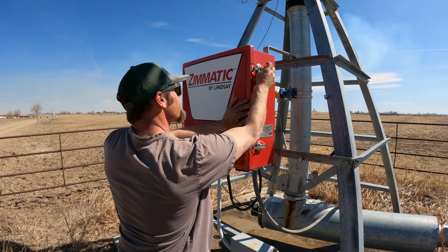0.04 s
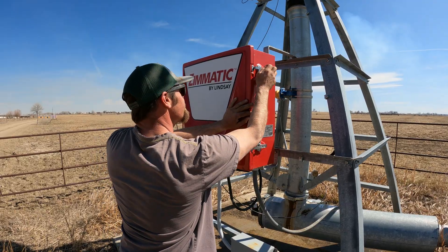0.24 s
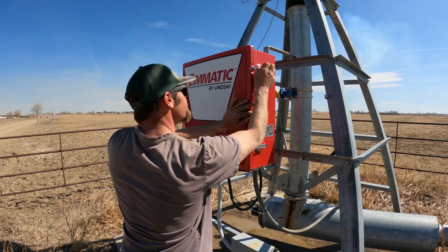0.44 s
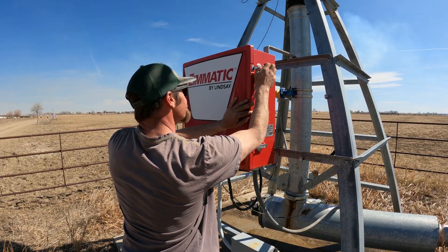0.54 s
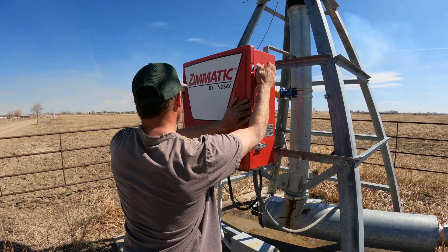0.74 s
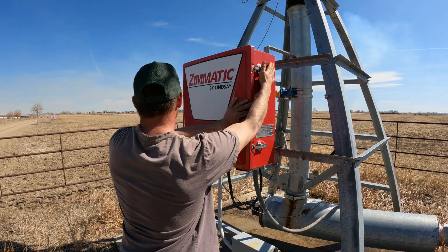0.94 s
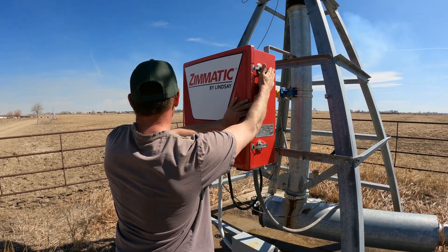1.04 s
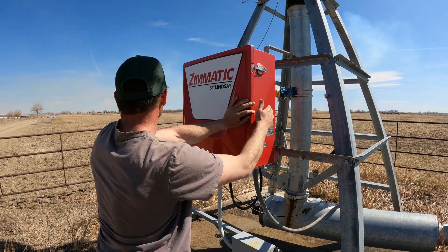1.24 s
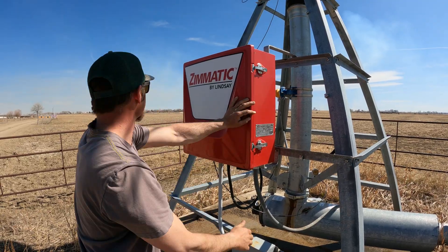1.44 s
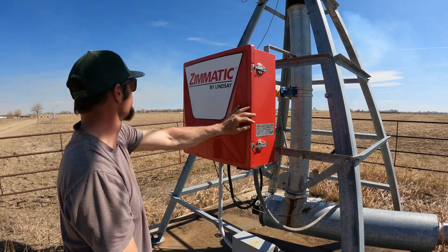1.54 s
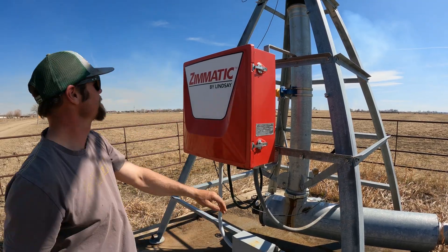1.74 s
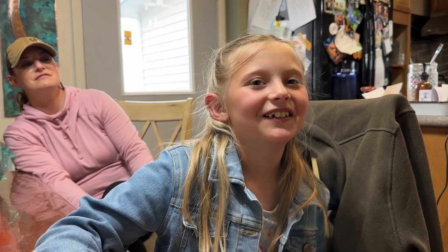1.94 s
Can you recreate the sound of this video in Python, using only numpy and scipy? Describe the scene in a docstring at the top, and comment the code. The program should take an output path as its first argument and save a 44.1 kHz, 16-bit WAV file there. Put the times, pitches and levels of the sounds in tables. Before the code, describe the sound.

Metal latches on a steel control box clatter quickly, snap once, then bang hard twice with a brief hollow ring; small ticks and dry rustle follow in an open field, close camera microphone buffeted by wind.

```python
"""A latch scrapes and snaps, then a sheet-steel control box bangs and rings briefly, a few metres off in an
open field. Small ticks and dry rustle fill the gaps; wind rumbles and puffs on a small camera's two ports.
Blows and gritty scrapes excite decaying modes and banded noise; ticks are short noisy rings; rustle, murmur
and wind are coloured noise. The level of rumble and flutter dips sharply and briefly just before the end."""
import sys
import numpy as np
from scipy import signal
from scipy.fft import rfft, irfft
from scipy.io import wavfile
from scipy.ndimage import uniform_filter1d

SR = 44100
rng = np.random.default_rng(int(sys.argv[2]) if len(sys.argv) > 2 else 0)


def wrap_up_sound(samples):
    """Save the sound to the file named by the first command line argument, as 16-bit audio."""
    columns = np.atleast_2d(samples).T
    # keep every value between -1 and 1, then stretch to whole-number steps
    tamed = np.clip(columns, -1, 1)
    steps = np.round(tamed * 32767).astype(np.int16)
    wavfile.write(sys.argv[1], SR, steps)


N = 88200  # samples: two seconds

# Latch and door blows: (time [s], crack peak [dB], boom [dB], clank [dB], ring [dB], snap [dB], base decay t60 [s],
# crack centre [Hz], crack width [share], crack t60 [s], thud of the lowest modes [dB])
BLOWS = [(0.0534, -34.5, -33, -33, -43, -47, 0.37, 2500, 0.18, 0.13, -31.5),
         (0.096, -35, -71, -41, -52, -47.5, 0.13, 1910, 0.081, 0.16, -68),
         (0.134, -29.5, -41.5, -33.5, -41.5, -68, 0.33, 1816, 0.064, 0.39, -59),
         (0.1632, -23, -63, -51, -40.5, -28.5, 0.17, 6200, 0.52, 0.042, -61),
         (0.1653, -19, -36, -22.5, -53, -34, 0.052, 1910, 0.25, 0.043, -48),
         (0.1883, -33, -70, -49.5, -69, -57, 0.027, 5440, 0.24, 0.046, -63),
         (0.497, -58, -68, -44.5, -57, -64, 0.075, 5500, 0.69, .02, -54),
         (0.5038, -42.5, -62, -35, -60, -75, 0.12, 934, 0.098, 0.23, -54),
         (0.5191, -20.5, -49, -29.5, -40.5, -34, 0.21, 2125, 0.22, 0.2, -52),
         (0.5264, -13.5, -32, -21, -31.5, -22.5, 0.16, 1953, 0.19, 0.059, -38),
         (0.661, -36, -66, -51, -49, -66, 0.19, 1157, 0.095, 0.23, -51),
         (0.681, -24.5, -43.5, -31.5, -47, -51, 0.15, 2247, 0.12, 0.048, -42.5),
         (0.9615, -8.5, -33, -17.5, -24.5, -20.5, 0.13, 2570, 0.33, 0.019, -23),
         (1.0063, -11, -28, -18.5, -24.5, -32, 0.16, 2070, 0.96, 0.037, -19)]
# Boom, clank, ring and snap bands of the box: (low edge [Hz], high edge [Hz], multiplier of a blow's decay [share],
# wash gain [dB], tail against the blow [dB], tail t60 [s])
BANDS = [(138, 592, 1.3, -14, 2, 0.38), (780, 2120, 1.25, -10.5, -10.5, 0.24),
         (2780, 6680, 0.64, 1, -38, 0.12), (4900, 10800, 0.24, 0, -54, 0.086)]
# Modes of box and latch; any outside BANDS stay silent: (frequency [Hz], level [dB], t60 [s])
BOX_MODES = [(223.7, 0, 0.086), (308.3, -7.5, 0.16), (558, -12, 0.32), (585.3, -1.5, 0.32),
             (918, -22, 0.31), (960, -20.5, 0.36), (1155.5, -10.5, 0.34), (1285, -8, 0.15),
             (1443, -11, 0.21), (1696, -7.5, 0.2), (1840, -15, 0.15), (1972, -7, 0.16), (2197, 1.5, 0.15),
             (2600, -0.5, 0.06), (3378, -4.5, 0.22), (3480, -8.5, 0.26), (3876, -4.5, 0.19),
             (5600, -11.5, 0.05), (6180, -11, 0.054), (6960, -1, 0.09), (7430, -6, 0.087), (11200, -6, .02)]
# Latch sliding, metal on metal: (start [s], length [s], clank [dB], ring [dB], snap [dB], swell over the length [dB])
SCRAPES = [(0.048, 0.041, -62, -64, -69, -24), (0.116, 0.032, -52, -69, -70, -5),
           (0.212, 0.041, -70, -55.5, -81, -3), (0.649, 0.048, -45.5, -64, -84, 8.5),
           (0.903, 0.053, -59, -69.5, -99, 20.5), (1.054, 0.15, -48, -55.5, -65, -12)]
# Fingers, hinge and dry stalks: (time [s], level [dB], centre [Hz], t60 [s], width [share])
TICKS = [(0.01, -39, 3550, 0.022, 0.57), (0.0377, -40.5, 2960, 0.043, 2.8),
         (0.1161, -32.5, 3460, 0.039, 0.32), (0.218, -34, 1080, 0.046, 0.21),
         (0.2795, -38, 1370, 0.12, 1.36), (.29, -44.5, 665, 0.28, 0.13), (0.3016, -42, 5000, 0.099, 0.88),
         (0.3877, -44, 6060, 0.018, 4), (0.404, -40, 2880, 0.067, 2), (0.4385, -42.5, 4380, 0.061, 2.5),
         (0.647, -47, 6000, 0.13, 0.089), (0.68, -41.5, 7740, 0.033, 0.1), (0.7871, -40, 2840, 0.021, 2.4),
         (0.826, -46, 4040, 0.031, 6.2), (0.896, -41, 5070, 0.095, 1), (0.927, -41, 1880, 0.33, 1.6),
         (0.958, -29, 5800, 0.017, 0.39), (1.1245, -42.5, 4200, 0.043, 1.3), (1.1, -49.5, 1470, 1, 0.21),
         (1.154, -49.5, 5550, 0.067, 0.31), (1.196, -49.5, 5940, 0.04, 0.96),
         (1.24, -39.5, 2660, 0.065, 0.74), (1.3844, -46, 7800, 0.04, 1.3), (1.512, -44, 5880, 0.024, 0.34),
         (1.5643, -39.5, 5770, 0.094, 0.24), (1.6246, -38, 4000, 0.07, 0.31),
         (1.7133, -28, 2310, 0.074, 1.2), (1.8203, -33.5, 5250, 0.043, 0.25),
         (1.8834, -46.5, 4900, 0.047, 1.4)]
# Dry rustle over time: (time [s], level [dB])
RUSTLE_LEVEL = [(0, -53.5), (.2, -61.5), (.35, -57.5), (0.598, -58), (.85, -60.5), (1.1, -70), (1.298, -59),
                (1.451, -50), (1.6, -48.5), (1.67, -53), (1.8, -52.5), (1.898, -55), (1.904, -66), (2, -62)]
# Colour of the rustle: (frequency [Hz], density [dB per Hz])
RUSTLE_COLOUR = [(180, -64.5), (300, -9), (368, 5.5), (505, -22), (798, -3), (949, 2.5), (1220, 6.5),
                 (1990, 9.5), (2820, -4), (3460, 5.5), (4590, 1), (5730, 3.5), (13000, -7.5)]
# Wind on the microphone: (time [s], rumble [dB], flutter [dB], left minus right [dB])
WIND = [(0.0, -36.5, -46.5, -8.5), (0.081, -38, -54, 1), (0.11, -33, -66, 0), (0.15, -40, -57, -14),
        (0.19, -27, -60, -10), (0.27, -37, -49, 0), (0.29, -32, -47.5, -2), (0.349, -31, -53.5, -4.5),
        (0.51, -46.5, -56, 2), (0.53, -44, -45, 2), (0.6, -49.5, -66, 4), (0.719, -31.5, -56, -0.5),
        (0.79, -48.5, -45, -3), (0.82, -32.5, -61, -1.5), (0.901, -49, -52, -3), (0.93, -53, -52, -8.5),
        (0.972, -34, -29, -3), (1.06, -43, -47, 1), (1.1, -34, -43, -4), (1.23, -41.5, -59.5, -2),
        (1.6, -42.5, -58, 0.5), (1.631, -41, -36.5, -6), (1.66, -25.5, -46, -0.5),
        (1.689, -37.5, -45.5, -9), (1.79, -39.5, -56.5, -2.5), (1.82, -51, -43, -6), (1.86, -25, -35, -3),
        (1.889, -47, -34, -6.5), (1.92, -43.5, -55.5, 0), (2.0, -35, -53, 3)]
# Colour of the wind rumble: (frequency [Hz], density [dB per Hz])
RUMBLE_COLOUR = [(8.8, -30), (15, -1), (43, 2), (63, -6.5), (92, -10), (108, -18.5), (160, -33), (210, -49),
                 (350, -120)]
# Colour of the flutter above it: (frequency [Hz], density [dB per Hz])
FLUTTER_COLOUR = [(90, 1.5), (130, 4), (250, -8), (400, -21.5), (600, -27), (1200, -61)]
# Single strong puffs: (centre [s], level [dB], swing [Hz], Gaussian spread [s])
PUFFS = [(0.065, -22.5, 44.6, 0.0066), (0.304, -27.5, 49, 0.02), (0.344, -18.5, 35.5, 0.0072),
         (0.388, -22.5, 34, 0.018), (.937, -17.5, 51.8, 0.005), (.977, -29, 111.6, .012),
         (1.1, -22, 55.5, 0.0083), (1.624, -31, 125, 0.0035), (1.649, -21, 79.6, 0.004),
         (1.7, -37, 121, 0.0025), (1.862, -18.5, 63, 0.0057), (1.881, -23, 63, 0.0061),
         (1.976, -28.5, 58, 0.011)]
# Colour of the distant murmur of wind: (frequency [Hz], density [dB per Hz])
MURMUR_COLOUR = [(250, 2.5), (400, 10), (560, 5), (800, 0), (1000, 0.5), (1400, -34)]
# Distant murmur over time: (time [s], level [dB])
MURMUR_LEVEL = [(0, -56.5), (.45, -59), (.75, -55), (.87, -70), (1.1, -53), (1.28, -76), (1.5, -65),
                (1.8, -61), (2, -56.5)]
# Level between the two ports: (frequency [Hz], left minus right [dB])
PORT_LEVEL = [(60, -2.0), (110, -1.5), (200, -1.5), (380, -2.0), (700, -1.5), (1290, -1.0), (2380, -6.0),
              (4390, -3.0), (8110, 0.0), (15000, 0.0)]
# Phase between the two ports: (frequency [Hz], lead of the left [rad])
PORT_PHASE = [(0, 0), (780, -0.3), (1030, -0.6), (1290, -0.5), (2580, -1.8), (3010, -0.7), (3270, -0.7),
              (4050, -1.1), (4820, 0.1), (9910, -0.1), (12000, 0.7), (13200, 0.6), (13700, 0.3),
              (15200, 0.2)]
# Microphone colour: (frequency [Hz], gain [dB])
MIC = [(8000, -3.5), (11500, -7), (13000, -9), (15000, -26)]

ATTACK_S = 0.00028  # time constant of every onset
RATTLE_HZ, RATTLE_DB = 247.4, 1.5  # uneven level of the blows' wash
STRIKE_DB, STRIKE_SPREAD_DB = 24, 2  # push of a blow on the modes, and how it differs from mode to mode
MODE_WAVER_HZ, MODE_WAVER_DB = 90, 3.5  # random uneven level that roughens each ring
MODE_DRIFT = .012  # share by which each ring's pitch wanders at random, which broadens it
THUD_TOP_HZ = 400  # modes below this flex the whole door
SCRAPE_PER_S, SCRAPE_SPREAD_DB = 2500, 3  # mean rate of the grit impulses, and their slow spread
SCRAPE_RING_DB, SCRAPE_FADE_S = -3, .012  # push of a scrape on the modes, and its ending
CRACK_BROAD_DB, TICK_BROAD_DB = -40, -10.5  # broad click at the onset
NEAR_ECHO_S, NEAR_ECHO_DB = .0031, -16.5
RUSTLE_GRAIN_DB, RUSTLE_FLICKER_DB, RUSTLE_SIDE_DB = 1.2, .8, -14
RUSTLE_LATE_S, RUSTLE_LATE_HZ = 1.903, 8300  # from here on the hiss is duller
WIND_SIDE_DB = -5.5
GUST_HZ, GUST_DB = 18, 3  # rumble and flutter come unevenly
DIP_S, DIP_DB, DIP_FALL_S, DIP_BACK_S = 1.903, -38, .006, .051  # deepest moment, depth, fall, return
TOP_HZ = 15579
LEFT_RIGHT = np.array([[1], [-1]])  # a side signal has opposite sign in the two channels


def undb(db):
    """Decibels to gain."""
    return 10 ** (np.asarray(db) / 20)


def unit(x):
    """Scale to rms 1."""
    return x / np.sqrt(np.mean(x ** 2))


def over_time(t, points, column=1):
    """Read one column of a time table, in straight lines between its points."""
    p = np.array(points)
    return np.interp(t, p[:, 0], p[:, column])


def over_hz(points, hz):
    """Read (frequency [Hz], value) points on a log-frequency axis."""
    p = np.array(points, float)
    return np.interp(np.log(hz + 1), np.log(p[:, 0] + 1), p[:, 1])


def coloured(x, points):
    """Filter x by (frequency [Hz], level [dB]) points, cut below half the first frequency, rms 1."""
    hz = np.arange(N // 2 + 1) * SR / N
    inside = hz > points[0][0] / 2
    return unit(irfft(rfft(x) * undb(over_hz(points, hz)) * inside, N))


def band(x, lo_hz, hi_hz):
    """Band-pass."""
    edges = [lo_hz, min(hi_hz, SR / 2.2)]
    return signal.sosfilt(signal.butter(2, edges, "band", fs=SR, output="sos"), x)


def walk(rate):
    """Random levels drawn at the given rate [Hz], joined by slopes; rms 1."""
    hold = max(int(SR / rate), 1)
    steps = np.repeat(rng.standard_normal(N // hold + 1), hold)
    return unit(uniform_filter1d(steps, hold)[:N])


def fall(t, t60):
    """Quick rise at t = 0, then exponential decay."""
    t = np.maximum(t, 0)
    return (1 - np.exp(-t / ATTACK_S)) * 10 ** (-3 * t / t60)


def add_noisy_ring(out, start_s, level_db, hz, t60, share, broad_db):
    """Add a short noisy ring about hz with a brief broad click at its start."""
    i = int(start_s * SR)
    ring_noise, click_noise = rng.standard_normal((2, 8192))[:, :N - i]
    t = np.arange(len(ring_noise)) / SR
    spread = (1 + np.clip(1.4 * share, .03, 4)) ** .5
    ring = band(ring_noise, hz / spread, hz * spread)
    ring = band(ring, hz / spread, hz * spread)[::-1]  # reversed, so the filter's build-up is not at the onset
    ring = ring / np.abs(signal.hilbert(ring)) ** .5 * fall(t, t60)  # evened out, then left to decay
    click = band(click_noise, 1700, 12000) * fall(t, t60 / 3)
    out[i:i + 8192] += undb(level_db) * (ring / np.abs(ring).max() + undb(broad_db) * click)


def box(t):
    """Blows crack and rattle, scrapes rub; both ring the modes and the dense wash of the sheet."""
    out = np.zeros(N)
    rattle = undb(RATTLE_DB * walk(RATTLE_HZ))
    grit = scrape_grit()
    for k, (lo, hi, share, wash_db, tail_db, tail_s) in enumerate(BANDS):
        hit = sum(undb(b[2 + k]) * fall(t - b[0], b[6] * share) for b in BLOWS) * rattle
        tail = sum(undb(b[2 + k] + tail_db) * fall(t - b[0], tail_s) for b in BLOWS)
        rub = scrape_level(t, k) * grit if k else 0  # scrapes have no boom
        wash = undb(wash_db) * (hit + tail) * rng.standard_normal(N)
        width_gain = np.sqrt(SR / 2 / (hi - lo))  # makes up for the noise lost outside the band
        out += width_gain * band(wash + rub, lo, hi)
        out += box_modes(undb(SCRAPE_RING_DB) * rub, k)
    for b in BLOWS:
        add_noisy_ring(out, b[0], b[1], b[7], b[9], b[8], CRACK_BROAD_DB)
    return out


def scrape_grit():
    """Metal sliding on metal catches at random points: sparse impulses of uneven strength, rms 1."""
    catches = rng.random(N) < SCRAPE_PER_S / SR
    return unit(catches * rng.standard_normal(N) * undb(SCRAPE_SPREAD_DB * walk(120)))


def scrape_level(t, k):
    """Each scrape starts at once, swells or sinks steadily in dB and fades around its end."""
    level = 0
    for s in SCRAPES:
        start, length, swell_db = s[0], s[1], s[5]
        fade = np.clip((start + length - t) / SCRAPE_FADE_S + .5, 0, 1)
        level = level + undb(s[1 + k] + swell_db * (t - start) / length) * (t > start) * fade
    return level


def box_modes(rub, k):
    """Resonators of band k: each blow pushes each mode once, scrapes push them all along."""
    out = 0
    blows = np.array(BLOWS)
    at = (blows[:, 0] * SR).astype(int)
    for hz, db, t60 in BOX_MODES:
        if not BANDS[k][0] <= hz < BANDS[k][1]:
            continue
        push = rub + np.zeros(N, complex)
        blow_db = blows[:, -1 if hz < THUD_TOP_HZ else 2 + k]
        push[at] += undb(blow_db + STRIKE_DB + STRIKE_SPREAD_DB * rng.standard_normal(len(at)))
        turn = np.exp(2j * np.pi * hz / SR * np.cumsum(1 + MODE_DRIFT * walk(MODE_WAVER_HZ)))
        r = 10 ** (-3 / (t60 * SR))  # decay per sample
        ring = (signal.lfilter([1], [1, -r], push / turn) * turn).imag
        out = out + undb(db + MODE_WAVER_DB * walk(MODE_WAVER_HZ)) * np.sqrt(1 - r * r) * ring
    return out


def ticks():
    """Fingers, hinge and dry stalks each give a short noisy ring with a click."""
    out = np.zeros(N)
    for row in TICKS:
        add_noisy_ring(out, *row, TICK_BROAD_DB)
    return out


def near_echo(metal):
    """A band-limited reflection of the metal arrives a little later, to be spread to the sides."""
    late = np.roll(metal, int(NEAR_ECHO_S * SR))
    return undb(NEAR_ECHO_DB) * band(late, 1300, 5400)


def rustle(t):
    """Grainy dry hiss of noise with uneven sample strengths: mid and a weaker side."""
    grains = undb(RUSTLE_GRAIN_DB * rng.exponential(size=(2, N))) * rng.standard_normal((2, N))
    mid, side = (coloured(g, RUSTLE_COLOUR) for g in grains)
    gain = undb(over_time(t, RUSTLE_LEVEL) + RUSTLE_FLICKER_DB * walk(30.5))
    mid = np.where(t < RUSTLE_LATE_S, mid, band(mid, 100, RUSTLE_LATE_HZ))
    return gain * mid, gain * undb(RUSTLE_SIDE_DB) * band(side, 100, RUSTLE_LATE_HZ)


def wind(t):
    """Eddies press on both ports: a wandering rumble of evened size, flutter above it, and puffs."""
    out = 0
    for column, colour in ((1, RUMBLE_COLOUR), (2, FLUTTER_COLOUR)):
        mid, side = (coloured(rng.standard_normal(N), colour) for _ in range(2))
        mid = unit(mid / np.abs(signal.hilbert(mid)).clip(.3) ** 0.47)  # evens out the swings
        gain = undb(over_time(t, WIND, column) + GUST_DB * walk(GUST_HZ))
        out = out + gain * (mid + undb(WIND_SIDE_DB) * side * LEFT_RIGHT)
    drop = np.clip((t - DIP_S) / DIP_FALL_S + 1, 0, 1)
    back = np.clip(1 - (t - DIP_S) / DIP_BACK_S, 0, 1)
    balance = undb(over_time(t, WIND, 3) * LEFT_RIGHT / 2)
    return (out * undb(DIP_DB * drop * back) + puffs(t)) * balance


def puffs(t):
    """Each puff swings the diaphragm briefly: a cosine of random phase under a Gaussian swell."""
    out = 0
    for s, db, hz, length in PUFFS:
        phase = rng.standard_normal() / 2
        swell = np.exp(-.5 * ((t - s) / length) ** 2)
        out = out - undb(db) * swell * np.cos(2 * np.pi * hz * (t - s) + phase)
    return out


def distant_murmur(t):
    """Far wind: low, coloured noise whose level drifts."""
    return undb(over_time(t, MURMUR_LEVEL)) * coloured(rng.standard_normal(N), MURMUR_COLOUR)


def ports(x):
    """Sound from ahead reaches the two ports with unlike level and phase; the capsules dull the top."""
    hz = np.arange(N // 2 + 1) * SR / N
    half = undb(over_hz(PORT_LEVEL, hz) / 2) * np.exp(.5j * over_hz(PORT_PHASE, hz))
    sound = rfft(x) * undb(over_hz(MIC, hz))
    return np.array([irfft(sound * half, N), irfft(sound / half, N)])


def scene():
    """Box, ticks, rustle and murmur through the ports; rustle side and near echo; wind on the ports."""
    t = np.arange(N) / SR
    rustle_mid, rustle_side = rustle(t)
    metal = box(t) + ticks()
    ahead = ports(metal + rustle_mid + distant_murmur(t))
    sides = (rustle_side + near_echo(metal)) * LEFT_RIGHT
    return ahead + sides + wind(t)


def record(dry):
    """The camera cuts the top with a steep low-pass."""
    return signal.sosfilt(signal.ellip(8, .2, 70, TOP_HZ, fs=SR, output="sos"), dry)


dry = scene()
out = record(dry)
wrap_up_sound(out)
```